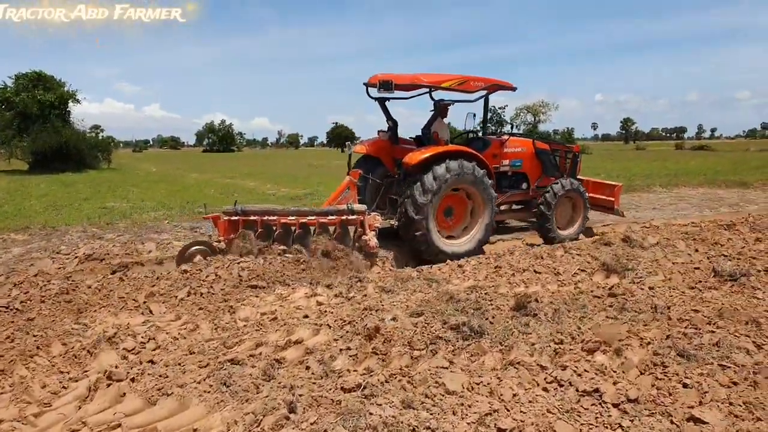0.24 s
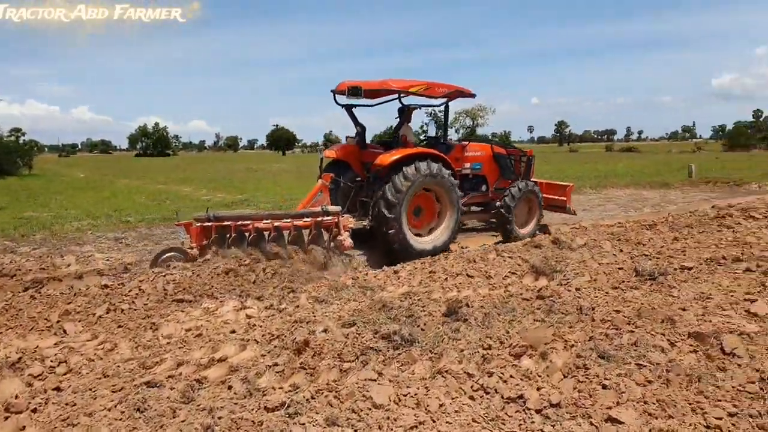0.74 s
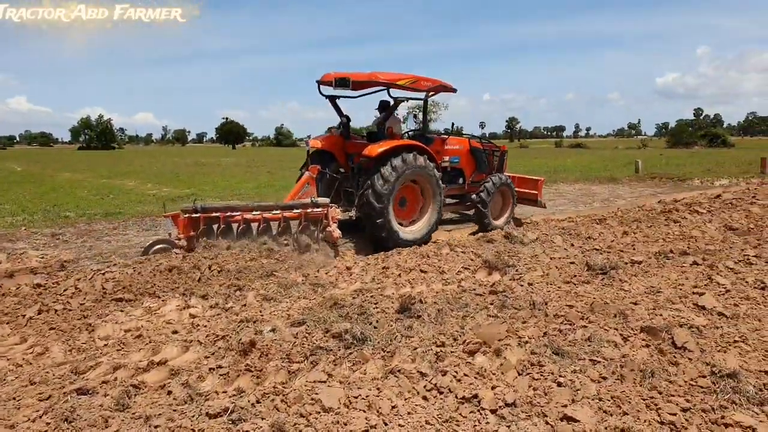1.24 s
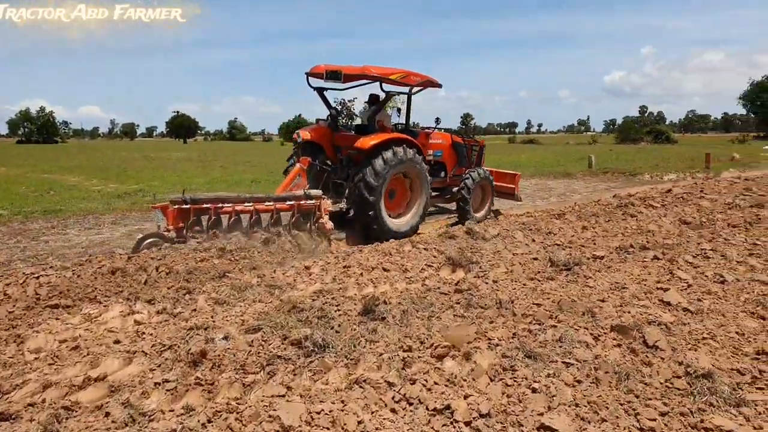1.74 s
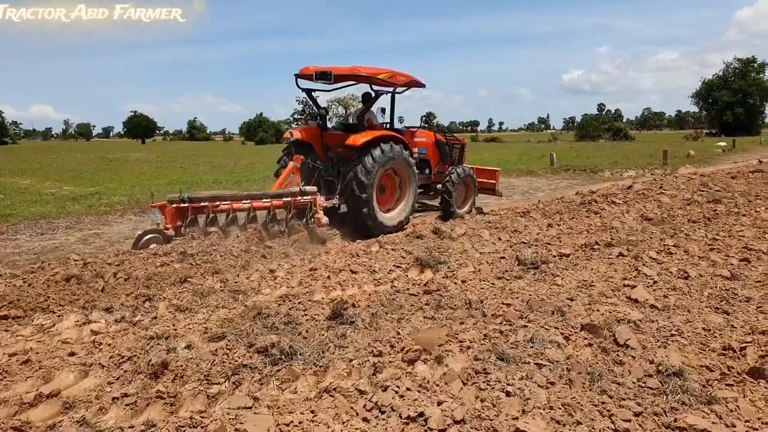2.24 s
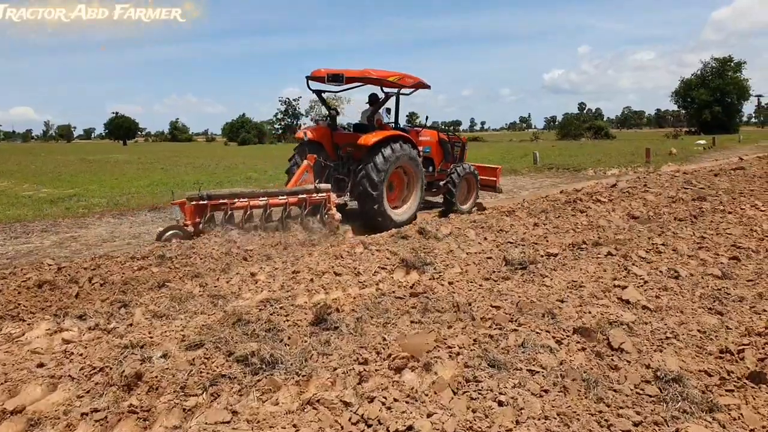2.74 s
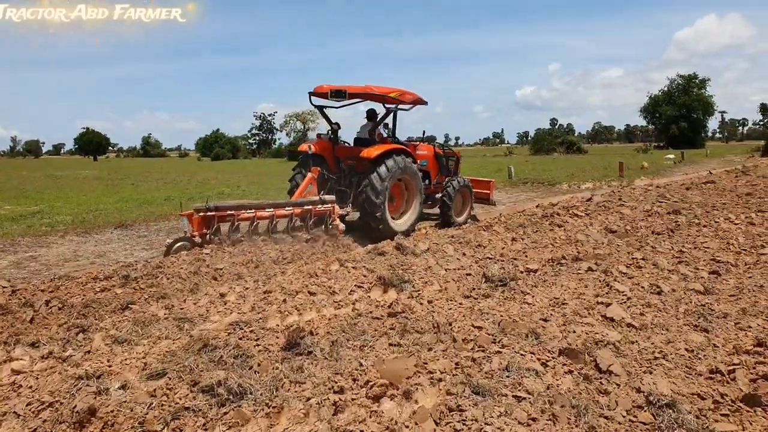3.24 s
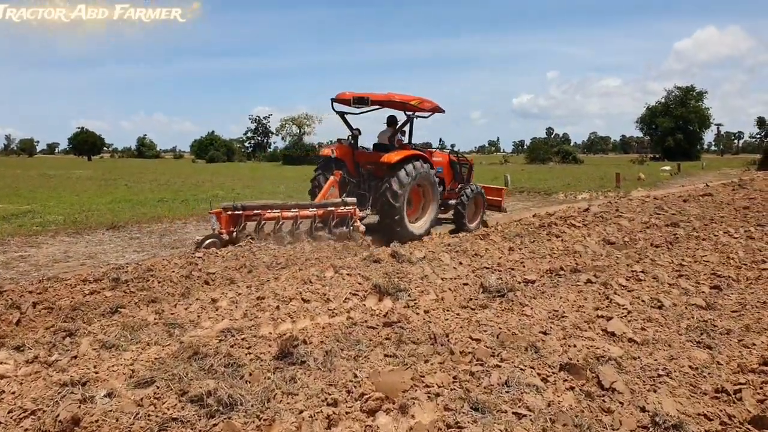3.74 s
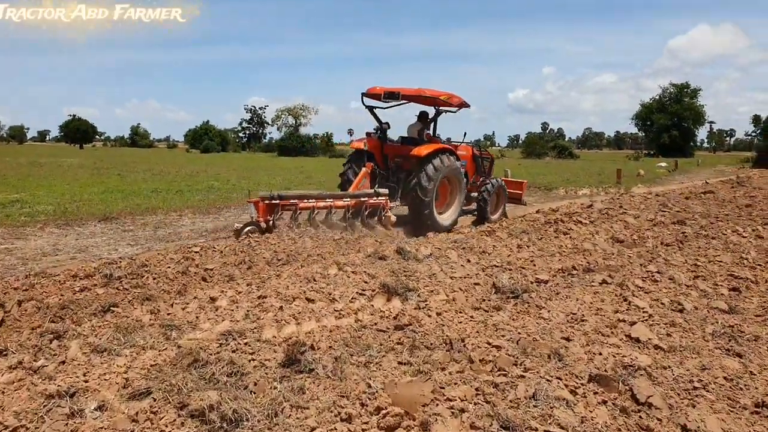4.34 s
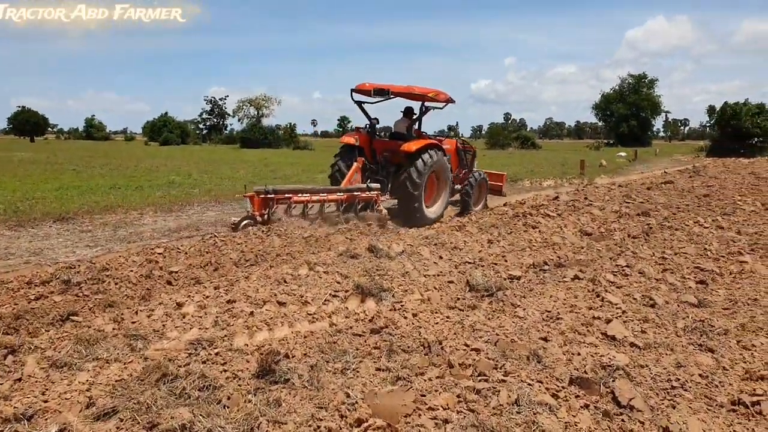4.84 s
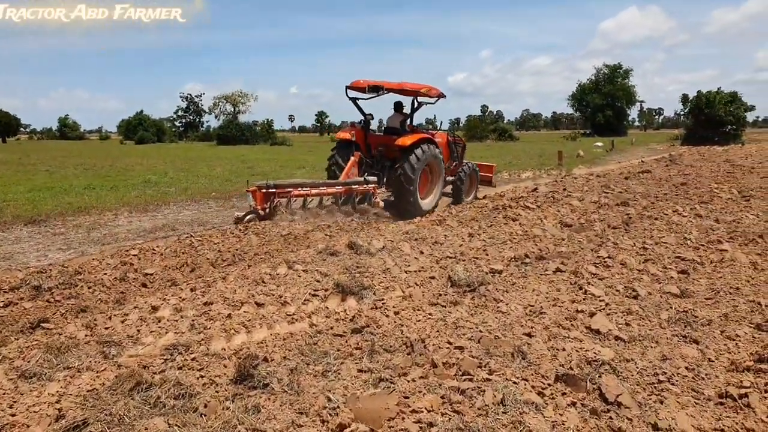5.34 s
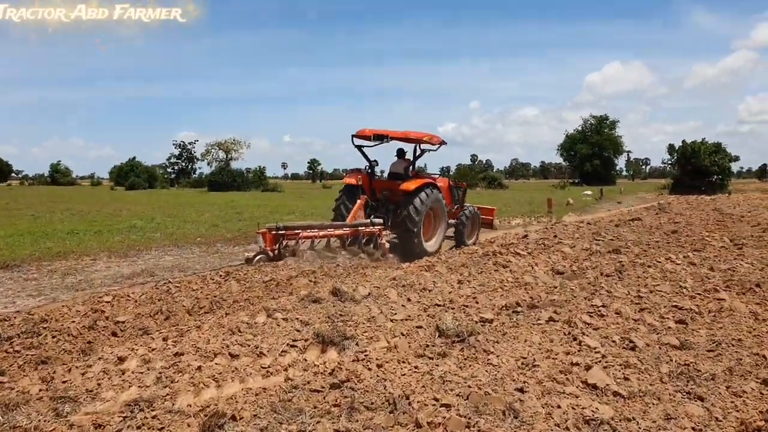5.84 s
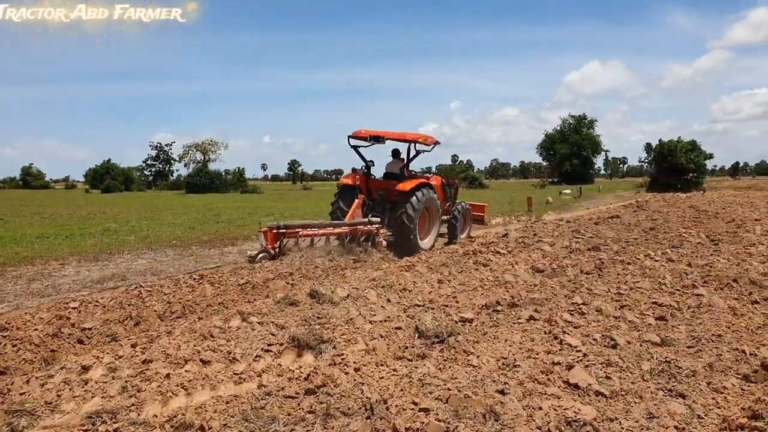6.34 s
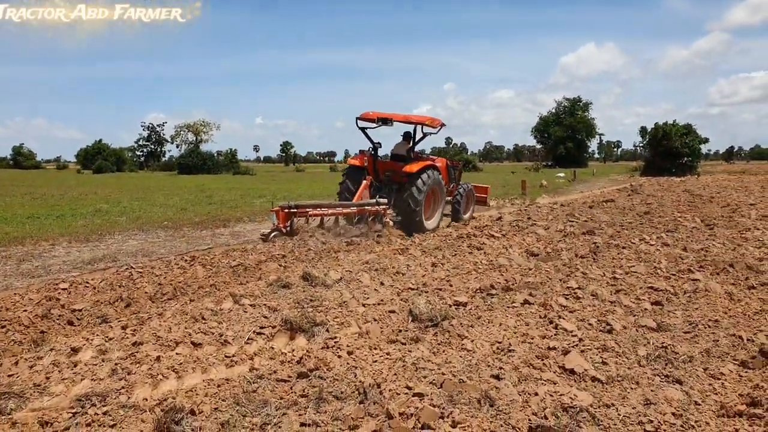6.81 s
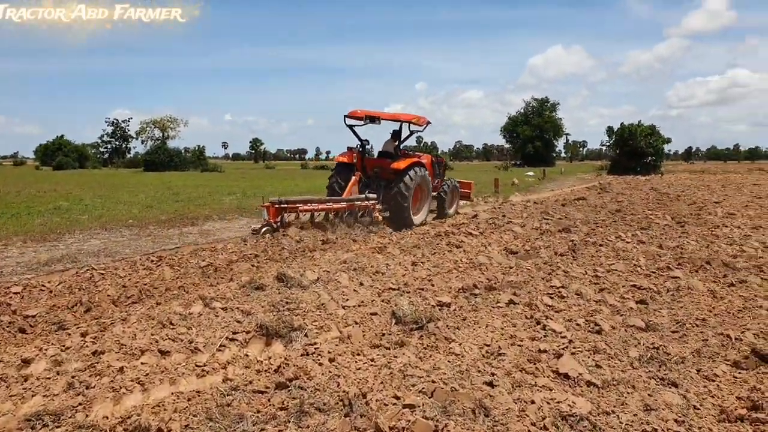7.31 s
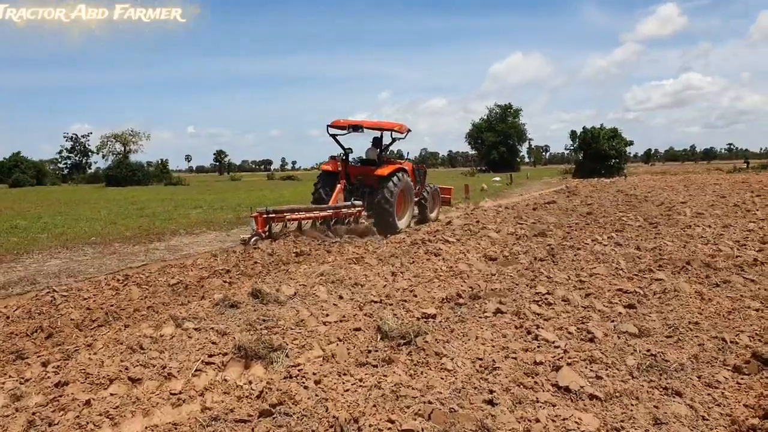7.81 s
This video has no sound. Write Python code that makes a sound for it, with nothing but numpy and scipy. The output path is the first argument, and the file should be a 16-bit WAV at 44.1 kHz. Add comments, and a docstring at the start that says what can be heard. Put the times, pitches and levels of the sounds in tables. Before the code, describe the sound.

In an open field a tractor drags a harrow away from a nearby handheld microphone. Rapid hard diesel knocking dominates the midrange, joined by passing gear whines and a brief panel buzz. Bassy wind bumps come densely at first and more sparsely later. From past the middle, crackly clicks appear on the right as the engine recedes; no reverberant space.

```python
"""Wind bumps against the microphone and a four-cylinder diesel knocks, dragging a disc harrow through dry soil.
Noise and taps pulsed at every firing ring the block, and shaft-locked sines make gears, whines and exhaust drone.
Grainy noise hisses as crumbling soil behind; the tractor slowly draws away over an open field.
Shaped low noise buffets the two ports, band bursts knock and tick, and later dry clicks sputter on the right.
A wind gate takes the bass out of the right port whenever that bass is weak."""
import sys
import numpy as np
from scipy import signal
from scipy.fft import rfft, irfft
from scipy.io import wavfile
from scipy.ndimage import uniform_filter1d

SR = 44100
rng = np.random.default_rng(int(sys.argv[2]) if len(sys.argv) > 2 else 0)


def unload_wav(signal):
    """Save mono or channel-first audio to the path in sys.argv[1] as 16-bit WAV at rate SR, clipped to [-1, 1]."""
    wavfile.write(
        sys.argv[1],
        SR,
        np.round(np.clip(np.atleast_2d(signal).T, -1, 1) * 32767).astype(np.int16),
    )


N = 355887
T = np.arange(N) / SR
HZ = np.fft.rfftfreq(N, 1 / SR)
LOG_HZ = np.log(HZ + 1)


def from_db(db):
    """Amplitude factor of a level in dB."""
    return 10 ** (np.asarray(db) / 20)


def unit(x):
    """Scales to rms 1."""
    return x / np.sqrt(np.mean(x ** 2) + 1e-20)


def curve(rows, axis=1):
    """One column of a table, interpolated at every sample."""
    rows = np.asarray(rows)
    return np.interp(T, rows[:, 0], rows[:, axis])


def across(points):
    """A table interpolated along the log-frequency axis."""
    hz, value = np.transpose(points)
    return np.interp(LOG_HZ, np.log(hz + 1), value)


def coloured(x, db):
    """Filters x by a gain in dB at every frequency; rms 1."""
    return unit(irfft(rfft(x) * from_db(db), N))


def wander(per_s):
    """Slow random motion of rms 1: sixteen sines from per_s / 8 up to per_s [Hz]."""
    t = T[::100]
    waves = [np.sin(2 * np.pi * (f * t + rng.random())) for f in per_s * np.geomspace(1 / 8, 1, 16)]
    return unit(np.interp(T, t, sum(waves)))


def swell(s, half):
    """A bell in time that peaks at s; half is its standard deviation [s]."""
    bell = np.zeros(N)
    near = slice(*np.searchsorted(T, [s - 5 * half, s + 5 * half]))
    bell[near] = np.exp(-.5 * ((T[near] - s) / half) ** 2)
    return bell


# Likeness of the two microphone ports: (frequency [Hz], likeness [0-1])
PORT_LIKENESS = [(300, 0.32), (750, 0.87), (950, 0.99), (1200, 1), (1600, 0.19), (1850, 0.91), (2300, 0.92),
                 (3300, 0.89), (4200, 0.053), (7000, 0.58)]
# Phase lead of the left port: (frequency [Hz], lead [rad])
LEFT_LEAD = [(400, 1.75), (720, -1), (950, 2), (1080, 0), (1280, -1), (1520, 0.7), (1650, 0.6), (1900, 0.3),
             (2150, 5), (2450, 5), (3100, 5), (4100, 6), (6000, 2.5)]
# Left port over the right one: (frequency [Hz], level [dB])
PORT_BALANCE = [(300, -14), (500, -1), (850, -4), (1100, 1.5), (1400, -1.5), (1700, 1), (2600, 2),
                (3300, 1.5), (7000, 0.5)]


def ports(direct, diffuse):
    """Two microphone ports hear one source with a phase lead, plus unrelated scatter from the ground."""
    alike = np.clip(across(PORT_LIKENESS), 0, 1)
    mixed = alike * direct + np.sqrt(1 - alike ** 2) * diffuse
    right = mixed * np.exp(-1j * across(LEFT_LEAD))
    tilt = from_db(across(PORT_BALANCE) / 2)
    return irfft(np.array([direct * tilt, right / tilt]), N)


# Mean crankshaft speed, sagging under load and picking up: (time [s], speed [turns/s])
SHAFT_SPEED = [(0, 26.55), (0.4, 26.7), (1, 26.75), (1.4, 26.6), (1.6, 26.3), (2, 26.2), (2.25, 26.6),
               (3, 26.68), (3.4, 27.25), (3.8, 27.38), (4.6, 28.22), (5.5, 28.1), (5.8, 28.3), (6.2, 28.25),
               (6.6, 27.7), (7.2, 27.72), (7.6, 27.45), (8.07, 27.45)]


def crank(wobble=.002, wobbles_per_s=24):
    """Turns so far, with slight unsteadiness and a quick twisting wobble [turns] that blurs the high tones."""
    speed = curve(SHAFT_SPEED) * (1 + .0015 * wander(9))
    return np.cumsum(speed) / SR + wobble * wander(wobbles_per_s)


def knock(turns, depth, skew, uneven=0.67):
    """Loudness of the clatter: two firings a turn, each flaring and dying, no two alike."""
    firing, age = np.divmod(2 * turns, 1)
    firing = firing.astype(int)
    force = (1 + uneven * rng.standard_normal(firing.max() + 1))[firing]
    flare = np.sin(np.pi * age ** abs(skew)) ** 2
    return unit(1 + depth * force * flare)


def taps(turns, uneven=0.43, count=40):
    """Valves, injectors and pistons tap at nearly the same crank angles after every firing."""
    out = np.zeros(N)
    firings = 2 * turns
    for angle, size in zip(rng.random(count), rng.standard_normal(count)):
        at = np.searchsorted(firings, np.arange(angle, firings[-1]))
        slip = np.round(2.3 * rng.standard_normal(len(at))).astype(int)  # samples
        out[np.clip(at + slip, 0, N - 1)] += size * (1 + uneven * rng.standard_normal(len(at)))
    return unit(out)


# Flutter of the clatter from unequal cylinders and valve gear: (multiple of shaft speed, depth [0-1])
VALVE_FLUTTER = [(.5, .2), (4.5, .09), (5.5, .12), (6, .09), (6.5, .15)]


def clatter(turns, depth, skew, regular, flutter, ragged_db, ragged_per_s):
    """Spectra of two streams of noise and taps that share firing beat, any valve flutter and a ragged grain."""
    valves = 0
    if flutter:
        valves = sum(share * np.sin(2 * np.pi * (order * turns + rng.random()))
                     for order, share in VALVE_FLUTTER)
    beat = knock(turns, depth, skew) * (1 + valves) * from_db(ragged_db * wander(ragged_per_s))
    return [rfft(beat * (rng.standard_normal(N) + regular * taps(turns))) for _ in range(2)]


def tones(turns, table, waver_db, rough=0):
    """Sines locked to the shaft, each swelling and fading in moving air; backlash may roughen their phase."""
    total = 0
    for order, db in table:
        size = np.sqrt(2) * from_db(db + waver_db * wander(5))
        phase = round(order) * turns + rough * wander(40) + rng.random()
        total = total + size * np.sin(2 * np.pi * phase)
    return total


# What block and panels radiate: (frequency [Hz], relative density [dB per Hz])
BLOCK_COLOUR = [(40, -32), (230, -12), (450, -12.5), (650, -8), (930, -7), (1300, 0.5), (1600, -10),
                (2100, -8), (3000, -9), (3600, -9), (5500, -17), (7000, -21), (10000, -75)]
# Resonances: (frequency [Hz], width [Hz], lift from the side [dB], lift from behind [dB])
PANEL_RESONANCES = [(792, 250, 6, 8), (1080, 110, 1.5, 2.5), (1374, 100.0, 0, 0.5), (1470, 62, 2, 3.6),
                    (1701, 210, 5, 7), (1923, 340, 6, 2), (2526, 260, 7, -0.5), (2620, 180, -7.5, 3.5),
                    (2970, 590, 4, -0.5), (3316, 300, 3, 7.5), (3516, 114, -1.5, -8.5),
                    (5200, 1800, 3, 0.3)]
# How far the tractor is heard from behind rather than from the side: (time [s], share [0-1])
BEHIND_SHARE = [(0, 0), (2.1, 0), (3.4, 1), (4.3, 0.64), (8.07, 1)]
# Gear and injection pump tones: (multiple of shaft speed, level before gears_db [dB])
GEAR_TONES = [(17, -25.5), (20, -22), (22, -18), (24, -12), (27, -19), (28, -18.5), (34, -17.5), (39, -14),
              (40, -16.5), (41, -22), (42, -15.5), (44, -15), (46, -19.5), (48, -13), (50, -17.5),
              (52, -13), (65, -15.5)]
# Body and gears on the right port, on top of the port balance: (time [s], level [dB])
RIGHT_BODY = [(0, -2.5), (5.2, -1.5), (8.07, -2)]
# Treble of the clatter: (time [s], level before bright_db [dB])
TREBLE_LEVEL = [(0, -1), (0.1, -6), (0.5, -6), (1.05, -2.5), (1.5, -3), (2.2, -2), (2.8, -4), (3.6, -1.85),
                (5, -2.5), (8.07, -2.5)]


def engine(turns, split_hz=1900, body_db=-0.3, bright_db=-1.41, gears_db=-6.0):
    """Clatter rings the block; its colour shifts between the view from the side and from behind."""
    drive = clatter(turns, depth=0.28, skew=0.62, regular=0.42, flutter=True, ragged_db=1.05, ragged_per_s=190)
    rattle = clatter(turns, depth=0.3, skew=0.9, regular=0.3, flutter=False, ragged_db=.6, ragged_per_s=140)
    low = 1 / (1 + (HZ / split_hz) ** 8)
    behind = curve(BEHIND_SHARE)
    body = bright = 0
    for view, share in enumerate([1 - behind, behind]):
        lifts = sum(lift[view] * np.exp(-2 * ((HZ - hz) / width) ** 2)
                    for hz, width, *lift in PANEL_RESONANCES)
        colour = from_db(across(BLOCK_COLOUR) + lifts)
        body = body + share * unit(ports(*[x * colour * low for x in drive]))
        bright = bright + share * unit(ports(*[x * colour * (1 - low) for x in rattle]))
    gear_sound = rfft(tones(turns, GEAR_TONES, waver_db=2.5, rough=.09))
    gears = ports(gear_sound, gear_sound)
    lows = from_db(body_db) * body + from_db(gears_db) * gears
    lows = lows * from_db([0 * T, curve(RIGHT_BODY)])
    return lows + from_db(curve(TREBLE_LEVEL) + bright_db) * bright


def ground_echo(x, gain=.27, delay_s=.004, shift_s=.0003, shifts_per_s=2.5):
    """The bounce off lumpy ground changes its path as the tractor jolts along, so resonances keep shifting."""
    late = T - delay_s - shift_s * wander(shifts_per_s)
    bounce = np.array([np.interp(late, T, port) for port in x])
    return (x + gain * bounce) / np.hypot(1, gain)


# Main gear whine, present throughout: (time [s], level before level_db and waver [dB])
MESH_LEVEL = [(0, -20), (0.55, -8.5), (1, -13), (1.35, -20), (1.6, -18), (1.95, -9), (2.35, -18),
              (3.9, -18), (4.3, -10.5), (5.4, -8.5), (6.2, -11), (7.4, -9.5), (8.07, -11.5)]
# Passing whines: (peak time [s], half length [s], multiple of shaft speed, level before level_db and waver [dB])
PASSING_WHINES = [(0.15, 0.14, 40, -16), (0.45, 0.21, 27, -11), (1.3, 0.37, 40, -12), (1.6, 0.34, 39, -11),
                  (1.7, 0.35, 52, -12), (1.957, 0.19, 27, -15), (2.296, 0.095, 40, -8.5),
                  (3.85, 0.48, 40, -14.5), (3.6, 0.84, 91, -14), (4.12, 0.16, 27, -16),
                  (4.85, 0.44, 39, -8.5), (5.5, 0.21, 27, -10)]
MESH_TEETH = 26  # main whine's multiple of the shaft speed


def whines(turns, level_db=-0.3, scatter=.7, waver_db=3, blur=.0018):
    """Gear meshes sing wavering lines that glide with the crankshaft: one throughout, others now and then."""
    voices = [(MESH_TEETH, from_db(curve(MESH_LEVEL)))]
    voices += [(round(order), swell(s, half) * from_db(db)) for s, half, order, db in PASSING_WHINES]
    lines = 0
    for order, size in voices:
        waver = from_db(waver_db * wander(13))
        phase = order * (turns + blur * wander(30)) + rng.random()
        lines = lines + size * waver * np.exp(2j * np.pi * phase)
    scattered = scatter * lines.imag * wander(9.4)
    return np.sqrt(2) * from_db(level_db) * ports(rfft(lines.real), rfft(scattered))


# Momentary panel buzzes:
# (peak time [s], half length [s], level before flutter [dB], centre [Hz], width [Hz])
PANEL_BUZZES = [(0.02, 0.019, -10, 3800, 350), (1.123, 0.34, -9, 3040, 360)]


def buzz(flutter_db=3.0):
    """Loose panels each ring for a moment in one broad, fluttering band of noise."""
    out = 0
    for s, half, db, hz, width in PANEL_BUZZES:
        band = np.exp(-2 * ((HZ - hz) / width) ** 2)
        ringing = unit(ports(*rfft(rng.standard_normal((2, N))) * band))
        out = out + ringing * swell(s, half) * from_db(db + flutter_db * wander(25.67))
    return out


# Crumbling soil behind the tractor: (frequency [Hz], relative density [dB per Hz])
SOIL_COLOUR = [(1000, -47), (5000, 4), (9000, 5.5), (12500, 5), (15000, 1.5)]


def soil(grain=0.28, level_db=-13.0):
    """Countless crumbs falling off the discs merge into a fine hiss of uneven noise grains."""
    crumbs = rng.standard_normal((2, N)) * np.exp(grain * rng.standard_normal((2, N)))
    return coloured(crumbs, across(SOIL_COLOUR)) * from_db(level_db + .5 * wander(40))


# Tractor over the field, swelling and then drawing away; the exhaust takes half of these dB,
# scene() applies them in full to the rest: (time [s], level [dB])
TRACTOR_LEVEL = [(0, -30), (0.75, -31), (1.05, -29.5), (1.45, -31.5), (2.05, -28), (2.3, -29.5),
                 (2.5, -32.5), (3.3, -32.5), (3.7, -32), (4.1, -29), (4.3, -28.5), (4.5, -33), (4.9, -33),
                 (5.1, -34), (5.55, -32), (6.1, -37), (6.8, -37.5), (8.07, -36.5)]
# Exhaust drone: (multiple of shaft speed, level before level_db and waver [dB])
EXHAUST_TONES = [(2, -10), (3, -11.5), (4, -13), (6, -18.5)]


def exhaust(turns, level_db=-21.0, right_db=-4):
    """The firing drone: low sines on the shaft that fade half as fast as the clatter, weaker on the right."""
    level = from_db(curve(TRACTOR_LEVEL) / 2 + level_db)
    drone = level * tones(turns, EXHAUST_TONES, waver_db=-4.5)
    return np.array([drone, from_db(right_db) * drone])


# Colour of the wind on the microphone: (frequency [Hz], relative density [dB per Hz])
WIND_COLOUR = [(10, -29), (28, -16), (55, 1.5), (80, 2), (130, -7.5), (200, -13), (300, -20.5), (500, -23),
               (1000, -27.5), (3000, -82)]
# Breeze between the gusts: (time [s], level before level_db and lumps [dB])
BREEZE_LEVEL = [(0, -35.5), (.3, -35), (.55, -35), (1.25, -39), (1.7, -33.5), (2.6, -31.5), (3.1, -38),
                (3.55, -37.5), (4.1, -31), (4.7, -34), (5.15, -36.5), (5.8, -31), (6.2, -35.5), (6.85, -32),
                (7.4, -32), (8.07, -34)]


def wind(level_db=-1.5, right_db=0, steady=0.78, lump_db=2.5, lumps_per_s=34):
    """Low noise under the gusts: each port has its own eddies, both feel the same lumps in the breeze."""
    eddies = coloured(rng.standard_normal((2, N)), across(WIND_COLOUR))
    power = np.maximum(uniform_filter1d(eddies ** 2, size=2200), 1e-6)
    evened = unit(eddies / power ** (steady / 2))
    strength = curve(BREEZE_LEVEL) + level_db + lump_db * wander(lumps_per_s)
    return evened * from_db([strength, strength + right_db])


# Gusts that strike the microphone: (peak time [s], level before level_db [dB], half length [s],
# nominal corner [Hz], left over right [dB])
GUSTS = [(0.077, -19, 0.0093, 140, -3), (0.165, -25.5, 0.015, 120, 2), (0.233, -23, 0.012, 180, -4),
         (0.279, -28, 0.015, 280, 0), (0.329, -25, 0.01, 174, -3), (0.376, -24, 0.008, 110, 4),
         (0.431, -25, 0.014, 150, 5), (0.523, -24, 0.0072, 100, -1), (0.588, -21, 0.008, 151, -1),
         (0.616, -18, 0.0075, 141, -4), (0.654, -18, 0.011, 130, -2), (0.727, -22.5, 0.0093, 120, 1),
         (0.894, -23, 0.017, 110, 3), (1.152, -17.5, 0.0088, 108, 1), (1.391, -23, 0.0088, 100, 0),
         (1.43, -24, 0.011, 150, -3), (1.583, -21, 0.012, 159, 0), (1.628, -13.5, 0.0078, 170, 2),
         (1.677, -25, 0.013, 229, 1), (1.731, -18, 0.0071, 152, 3), (1.756, -23, 0.0081, 160, 8),
         (2.039, -19.5, 0.008, 118, -7), (2.105, -22.5, 0.008, 119, 8), (2.135, -21, 0.0073, 110, 2),
         (2.229, -19.5, 0.01, 95, 6), (2.325, -19, 0.0091, 120, -3.5), (2.351, -22, 0.007, 100, 2),
         (2.452, -17, 0.01, 140, 7), (2.49, -12, 0.0096, 131, 2), (2.54, -23, 0.01, 200, -1),
         (2.573, -16.5, 0.012, 105, 3), (2.778, -23.5, 0.016, 130, -1), (2.885, -20, 0.0059, 120, 0),
         (3.219, -27, 0.01, 220, -5), (3.235, -23, 0.0079, 110, 5), (3.268, -24.5, 0.008, 140, 3),
         (3.304, -22.5, 0.011, 141, -2), (3.466, -24, 0.0077, 95, -1), (3.691, -23, 0.008, 120, 1),
         (3.722, -22.5, 0.0088, 110, -5), (3.824, -25, 0.013, 110, -4), (4.06, -26, 0.011, 150, 4),
         (4.106, -24, 0.0076, 120, -2), (4.154, -25, 0.0074, 110, 0), (4.197, -23, 0.012, 130, 2),
         (4.359, -22.5, 0.012, 91, -1), (4.419, -23.5, 0.0073, 120, 9), (4.469, -23.5, 0.0084, 110, 12),
         (4.526, -22, 0.008, 110, 9), (4.597, -20.5, 0.008, 81, 1), (4.65, -23, 0.016, 109, 3),
         (4.747, -28, 0.008, 110, 3), (4.796, -22.5, 0.0088, 121, 1), (5.463, -25.5, 0.015, 110, -7),
         (5.499, -19.5, 0.014, 89, -1), (5.676, -17, 0.01, 121, 2), (5.727, -20.5, 0.011, 150, -3),
         (5.779, -27, 0.01, 110, 6), (6.259, -23.5, 0.009, 120, 2), (6.55, -26, 0.0076, 99, -1),
         (6.82, -23.5, 0.0081, 100, 2), (6.943, -25, 0.014, 170, -3), (7.046, -28, 0.0074, 100, 5),
         (7.138, -21.5, 0.018, 100, 6), (7.276, -32, 0.0087, 110, 14), (7.316, -21.5, 0.0091, 115, 6),
         (7.458, -24.5, 0.015, 110, -2), (7.569, -21, 0.0074, 182, 3), (7.843, -25.5, 0.0087, 100, -3)]


def buffets(level_db=-3):
    """Short hard gusts: bell-shaped bursts of low band noise, unrelated between the ports."""
    out = np.zeros((2, N))
    for s, db, half, hz, pan_db in GUSTS:
        near = np.flatnonzero(abs(T - s) < 3 * half)
        shape = np.exp(-.5 * ((T[near] - s) / half) ** 2)
        push = rng.standard_normal((2, SR // 2))
        band = signal.butter(2, [hz / 3.3, hz * 0.91], "band", fs=SR, output="sos")
        burst = signal.sosfilt(band, push)[:, -len(near):] * shape  # the filter has settled by then
        burst *= np.sqrt(np.mean(shape ** 2) / np.mean(burst ** 2, axis=1, keepdims=True))
        out[:, near] += burst * from_db(db + level_db + np.array([[pan_db], [-pan_db]]) / 2)
    return out


# Dull knocks and sharp ticks that stand out:
# (start time [s], level [dB], nominal centre [Hz], decay [s], left over right [dB])
SNAPS = [(0.202, -28, 330, .008, 4), (0.225, -28, 380, .007, -8), (0.275, -21.5, 403, 0.01, -7),
         (0.321, -27, 400, 0.009, -16), (0.361, -33, 1290, 0.0025, -14), (0.392, -25, 370, .007, 8),
         (0.505, -29.5, 340, 0.0058, 5), (1.625, -23, 330, 0.0068, -10), (1.759, -29, 330, 0.0078, -3),
         (2.246, -31, 370, .007, -6), (2.494, -18, 290, 0.005, 4), (2.543, -23, 340, 0.012, -5),
         (2.581, -16, 315, 0.012, -9), (2.619, -30, 320, .007, 7), (3.305, -29, 330, .007, -4),
         (3.378, -27.5, 270, 0.01, 2), (3.418, -28, 294, .009, -10), (4.04, -24, 227, 0.0027, 10),
         (4.708, -28.5, 328, 0.0073, -4.5), (5.660, -26, 320, .007, -6), (5.719, -22.5, 1050, 0.011, -4),
         (5.72, -23, 310, .01, -6), (5.741, -27, 480, .006, -12), (6.252, -30, 400, 0.0065, -8),
         (6.303, -29, 380, .006, -10), (6.753, -29, 420, 0.0049, -9), (6.945, -29, 520, .006, -13),
         (7.075, -29, 500, .006, -19), (7.770, -28, 400, 0.0055, -10), (1.45, -34, 13000, .0008, 0),
         (4.855, -31.5, 4800, .004, -3), (5.169, -15.5, 1090, 0.003, -22), (5.926, -14, 1700, 0.001, -24),
         (6.262, -28, 1300, .003, -18), (6.305, -24, 1100, 0.0023, -20), (6.762, -20.5, 1200, .003, -25)]


def ticks(level_db=0):
    """Snaps and knocks: a sudden noise burst in one band that dies within milliseconds."""
    out = np.zeros((2, N))
    t = T[:SR // 20]
    for s, db, hz, decay, pan_db in SNAPS:
        band = signal.butter(4, [hz * 0.52, min(hz * 1.37, .45 * SR)], "band", fs=SR, output="sos")
        shape = np.exp(-t / decay)
        snap = unit(signal.sosfilt(band, rng.standard_normal(len(t)) * shape))
        snap = snap * np.sqrt(np.mean(shape ** 2))
        side_db = np.minimum([[pan_db], [-pan_db]], 0)  # only the weaker side is lowered
        out[:, round(s * SR):][:, :len(t)] += snap * from_db(db + level_db + side_db)
    return out


# Dry sputters, mainly at the right port: (peak time [s], level before level_db [dB], length [s])
SPUTTER_CLUMPS = [(4.428, -23, 0.028), (4.495, -23, 0.018), (4.846, -24, 0.024), (4.966, -22.5, 0.011),
                  (5.196, -25, 0.0096), (5.465, -24, 0.0084), (5.726, -19, 0.019), (5.791, -26.5, 0.057),
                  (5.959, -25, 0.014), (5.996, -24, 0.026), (6.196, -28, 0.041), (6.257, -25.5, 0.026),
                  (6.304, -24, 0.015), (6.422, -29.5, 0.12), (6.554, -27.5, 0.022), (6.699, -25.5, 0.01),
                  (6.766, -28, 0.012), (7.044, -26, 0.024), (7.074, -27, 0.013), (7.192, -25.5, 0.021),
                  (7.267, -27, 0.038), (7.754, -29.5, 0.027), (7.959, -32, 0.06)]
# Their colour: (frequency [Hz], relative density [dB per Hz])
SPUTTER_COLOUR = [(150, -45), (350, 3.5), (580, -2.5), (750, 5), (950, 1.5), (1200, 0.5), (1700, -5),
                  (2500, -7.5), (3600, -13.5), (6000, -30)]
# Fainter ones at jittered times: start [s], rate [per s], level before level_db [dB], length [s]
SPUTTER_FROM_S, FAINT_PER_S, FAINT_DB, FAINT_S = 4.4, 7, -29, 0.02


def sputters(level_db=-4, left_db=-15, grain=0.63):
    """Clumps of tiny dry clicks made of uneven noise grains, nearly all on the right."""
    times = SPUTTER_FROM_S + (np.arange(60) + rng.random(60)) / FAINT_PER_S
    faint = [(s, FAINT_DB, FAINT_S) for s in times if s < T[-1]]
    clumps = np.sqrt(sum((from_db(db) * swell(s, length / 2)) ** 2
                         for s, db, length in list(SPUTTER_CLUMPS) + faint))
    clicks = unit(rng.standard_normal(N) * np.exp(grain * rng.standard_normal(N)))
    colour = unit(from_db(across(SPUTTER_COLOUR)))
    dry_clicks = irfft(rfft(clicks * clumps) * colour, N)
    return from_db([[level_db + left_db], [level_db]]) * dry_clicks


def scene(air_db=0.76):
    """Moving air makes engine, whines, buzz and soil swell and fade together; the rest is added beside them."""
    turns = crank()
    tractor = ground_echo(engine(turns)) + whines(turns) + buzz() + soil()
    tractor = tractor * from_db(curve(TRACTOR_LEVEL) + air_db * wander(8))
    return tractor + exhaust(turns) + wind() + buffets() + sputters() + ticks()


# Bass level under which the wind gate closes on the right port: (time [s], level [dB])
GATE_THRESHOLD = [(0, -34), (4.6, -41), (4.9, -31.5), (6.2, -28.5), (8.07, -28.5)]


def wind_gate(x, corner_hz=295, ratio=6, floor_db=-34):
    """Lowers the bass whenever it is weaker than a threshold, so that only the stronger bass breaks through."""
    bass = irfft(rfft(x) / (1 + (HZ / corner_hz) ** 8), N)
    power = uniform_filter1d(uniform_filter1d(bass ** 2, size=900), size=500)
    under_db = np.minimum(10 * np.log10(abs(power) + 1e-12) - curve(GATE_THRESHOLD), 0)
    return x - bass * (1 - from_db(np.maximum(ratio * under_db, floor_db)))


EDGE_HZ = 15480  # upper band limit


def record(dry, notch_hz=7500, notch_width_hz=900, notch_db=-8):
    """A wind gate on the right port, a hollow in the treble around 7.5 kHz, then the band limit."""
    hollow = from_db(notch_db * np.exp(-((HZ - notch_hz) / notch_width_hz) ** 2))
    heard = irfft(rfft([dry[0], wind_gate(dry[1])]) * hollow, N)
    lowpass = signal.firwin(801, EDGE_HZ, window=("kaiser", 9), fs=SR)
    return signal.oaconvolve(heard, lowpass[None], "same")


dry = scene()
out = record(dry)
unload_wav(out)
```